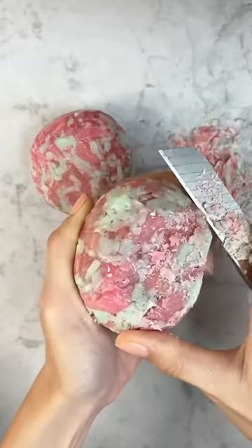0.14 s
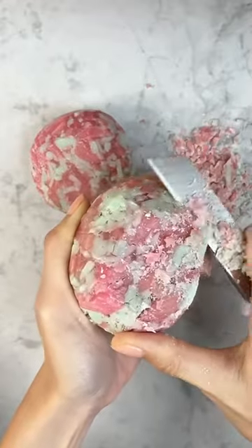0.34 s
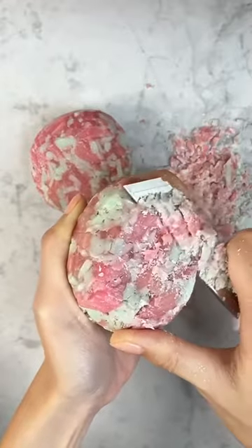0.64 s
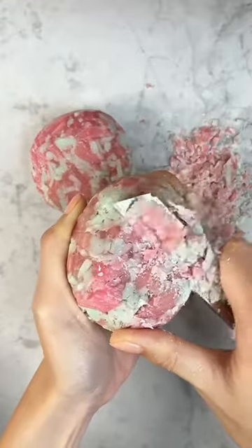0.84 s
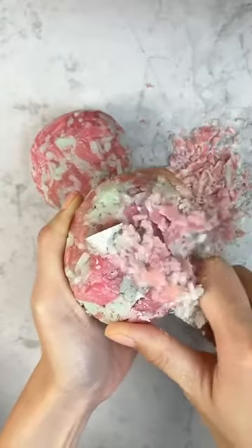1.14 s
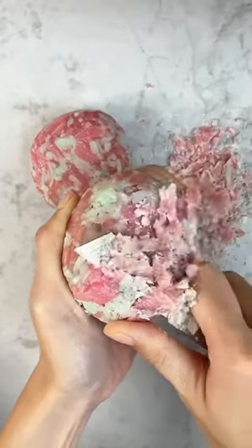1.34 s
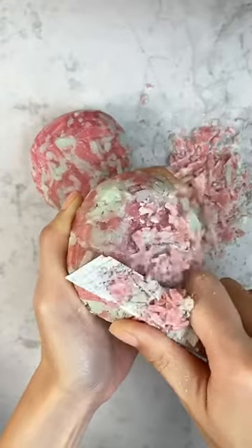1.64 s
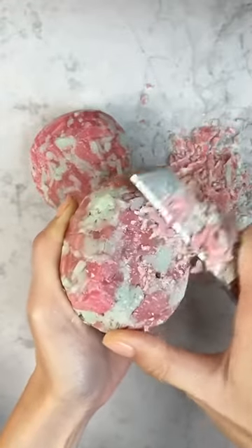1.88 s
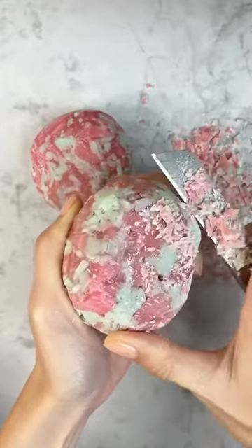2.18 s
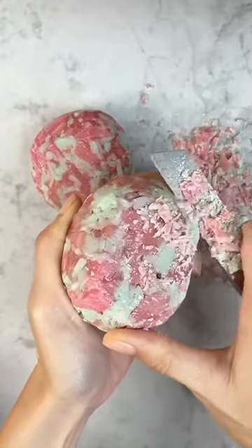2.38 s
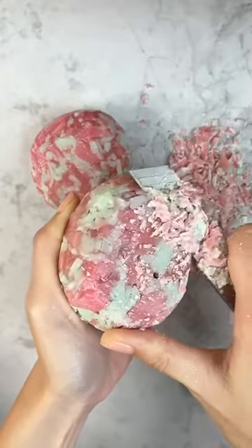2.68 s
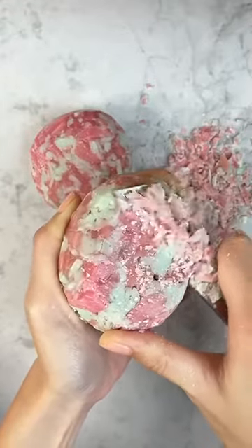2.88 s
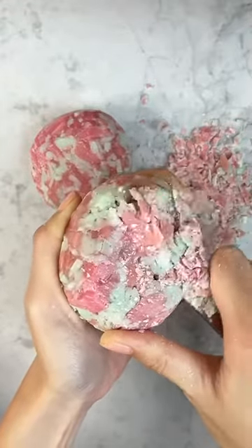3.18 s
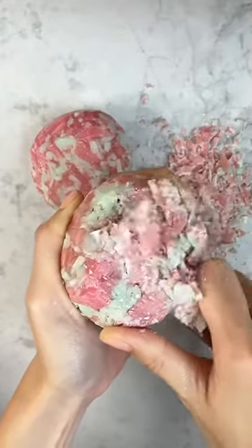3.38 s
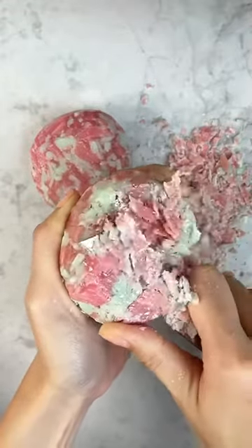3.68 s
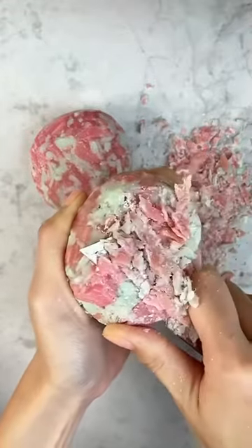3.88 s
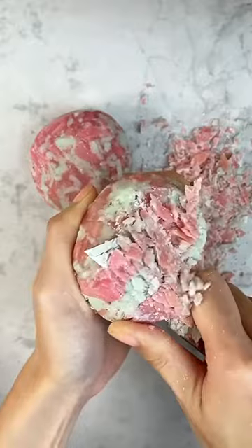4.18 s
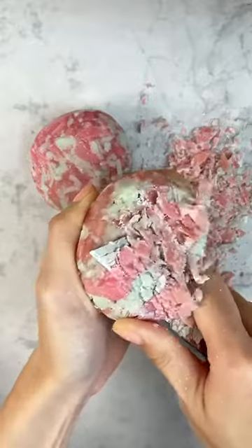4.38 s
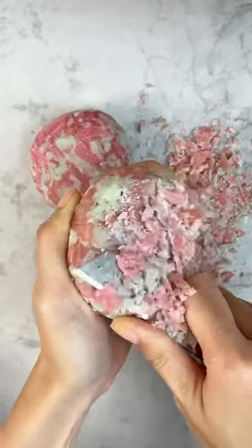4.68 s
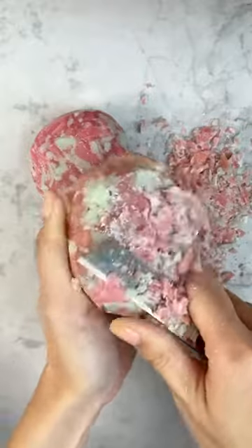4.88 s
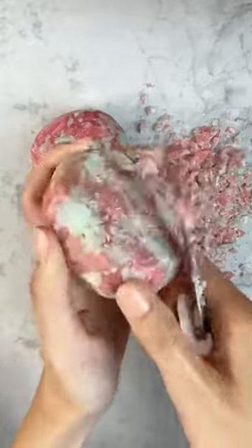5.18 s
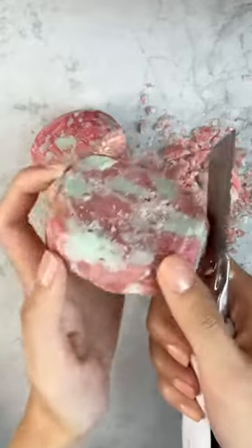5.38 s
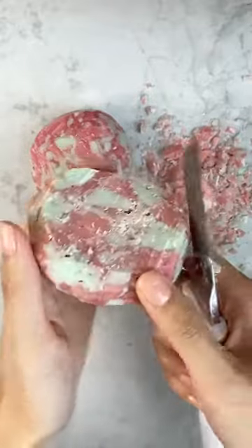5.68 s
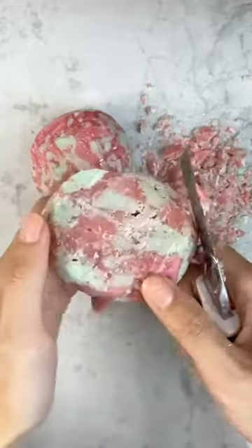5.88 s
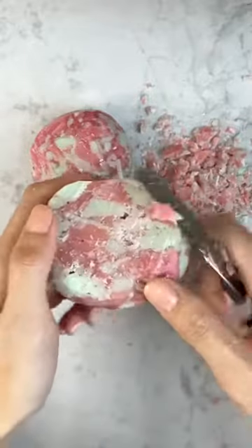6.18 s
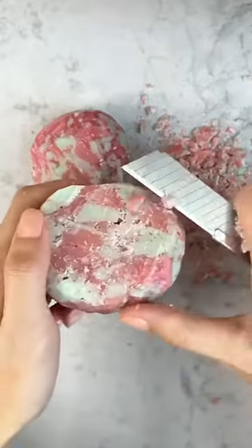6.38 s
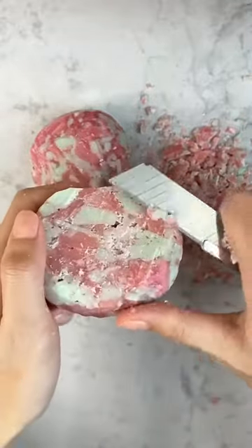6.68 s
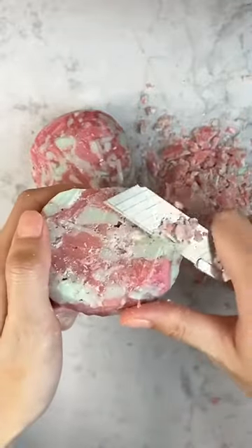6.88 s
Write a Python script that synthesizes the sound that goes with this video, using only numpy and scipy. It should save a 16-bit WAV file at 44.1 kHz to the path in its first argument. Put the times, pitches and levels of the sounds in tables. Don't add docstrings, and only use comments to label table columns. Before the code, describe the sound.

Rough, crackly soap shaving in a quiet room, recorded close and dry. Two long scraping strokes crunch and snap, each easing off before renewed cracking, while the ball knocks softly in the palm. Then the soap is turned with only faint skin brushing and crumbs. A bare blade taps and hits it with a short ring, and a bright crack breaks a piece loose before more crumbling.

```python
import sys
import numpy as np
from scipy import signal
from scipy.fft import rfft, irfft
from scipy.io import wavfile

SR = 44100
rng = np.random.default_rng(int(sys.argv[2]) if len(sys.argv) > 2 else 0)


def put_to_file(sound):
    columns = np.atleast_2d(sound).T
    safe = np.clip(columns, -1, 1)
    whole_steps = np.round(safe * 32767)
    wavfile.write(sys.argv[1], SR, whole_steps.astype(np.int16))


def volts_from_decibels(level):
    exponent = np.asarray(level, float) / 20
    return 10 ** exponent


N = 310464

# pitch_hz, level_db (per Hz)
COARSE_SPECTRUM = [(250, 1), (700, 4), (1300, 1.5), (2200, 2.5), (4300, -0.5), (6500, -5.5), (10000, -10)]
# pitch_hz, level_db (per Hz)
FINE_SPECTRUM = [(3000, -19), (5700, -3), (6900, -3), (8400, -1), (10500, 0), (13500, -1.5), (15800, -5.5)]


def rms_one(x):
    return x / np.sqrt(np.mean(x ** 2) + 1e-20)


def colour(x, spectrum):
    hz, db = np.transpose(spectrum)
    log_hz = np.log(np.maximum(np.fft.rfftfreq(len(x), 1 / SR), 1))
    gain = volts_from_decibels(np.interp(log_hz, np.log(hz), db))
    return rms_one(irfft(rfft(x) * gain, len(x)))


def band_pass(x, low_hz, high_hz):
    return signal.sosfilt(signal.butter(2, [low_hz, high_hz], "band", fs=SR, output="sos"), x)


def drift(rate_hz):
    r = np.exp(-80 * np.pi * rate_hz / SR)
    slow = signal.lfilter([1], [1, -2 * r, r * r], rng.standard_normal(N // 40 + 2002))[2000:]
    return np.interp(np.arange(N) / 40, np.arange(len(slow)), rms_one(slow))


def ring(clicks, hz, t60_s):
    r, w = volts_from_decibels(-60 / (t60_s * SR)), 2 * np.pi * hz / SR
    return signal.lfilter([0, np.sin(w)], [1, -2 * r * np.cos(w), r * r], clicks + 1e-18)


def resonance(x, hz, width_hz):
    r = np.exp(-np.pi * width_hz / SR)
    top = np.array([1, 0, -1]) * (1 - r * r) / 2
    return signal.lfilter(top, [1, -2 * r * np.cos(2 * np.pi * hz / SR), r * r], x)


def grains(per_s, spread_db):
    sizes = volts_from_decibels(spread_db * np.minimum(rng.exponential(1, N), 5)) * rng.choice([-1, 1], N)
    return rms_one(sizes * (rng.random(N) < per_s / SR))


def patchy(x, low_hz, high_hz):
    edges = np.geomspace(low_hz, high_hz, 7)
    bands = [band_pass(x, low, high) for low, high in zip(edges, edges[1:])]
    return rms_one(sum(volts_from_decibels(2 * drift(40)) * band for band in bands))


def rumble():
    # pitch_hz, level_db (per Hz)
    rumble_spectrum = [(3, 0), (12, -5), (24, -13), (33, -22), (50, -18), (80, -28), (150, -40), (600, -80)]
    return volts_from_decibels(-33) * colour(rng.standard_normal(N), rumble_spectrum)


def room():
    # pitch_hz, level_db (per Hz)
    room_spectrum = [(60, -53.5), (170, 2.5), (340, -5), (680, -16), (1700, -18), (6700, -25.5),
                     (12400, -27.5), (16000, -31.5)]
    return volts_from_decibels(-61.5 + 1.0 * drift(6.1)) * colour(rng.standard_normal(N), room_spectrum)


def pressure():
    # start_s, hold_s, crumble_db, dust_db and tremor_db (both relative to the crumble)
    pushes = [(0.0, 0.014, -71, 12, 18.5), (0.323, 0.058, -56, 7, 3.5), (0.446, 0.16, -61, 6, -2),
              (0.653, 0.23, -63.5, 7, 14.5), (0.87, 0.15, -56.5, 8, 8), (1.053, 0.35, -58.5, 6.5, 11),
              (1.467, 0.069, -55.5, 6.5, 10), (1.723, 0.067, -49, -0.5, 5.5), (1.898, 0.14, -54.5, 2.5, 6),
              (2.125, 0.0087, -52.5, -12, 2), (2.411, 0.31, -65, 6, 5), (2.781, 0.63, -59.5, 4.5, 10.5),
              (3.284, 0.036, -55.5, 5, 9), (3.453, 0.36, -66, 9, 16.5), (4.026, 0.55, -82.5, 12, 15),
              (4.526, 0.16, -60.5, 6, 15), (4.759, 0.11, -60, -0.5, 11), (4.911, 0.45, -57.5, 2.5, 10),
              (5.42, 0.3, -69, 7, -7), (5.92, 0.078, -79.5, 13, 24), (6.171, 0.07, -68, -19, 5),
              (6.626, 0.15, -61, 3, -5), (6.896, 0.0094, -54.5, 7, 14), (7.007, 0.055, -62, 9, 7.5)]
    build_db_per_s, ease_db_per_s = 407, 299
    t, out = np.arange(N) / SR, np.full((3, N), -120.)
    for s, hold, db, dust_db, tremor_db in pushes:
        slack_db = build_db_per_s * np.maximum(s - t, 0) + ease_db_per_s * np.maximum(t - s - hold, 0)
        out = np.maximum(out, db - slack_db + np.array([[0], [dust_db], [tremor_db]]))
    return out


def brushes():
    # middle_s, length_s, level_db
    strokes = [
        (1.553, 0.025, -49.5),
        (2.152, 0.056, -65),
        (3.88, 0.022, -62),
        (4.035, 0.043, -69),
        (4.646, .016, -46),
        (4.788, 0.024, -48),
        (5.723, .1, -63),
        (5.847, .06, -68),
        (5.937, 0.072, -65),
        (6.06, 0.037, -71),
    ]
    t = np.arange(N) / SR
    hiss = band_pass(rng.standard_normal(N), 8500, 14500)
    swells = sum(volts_from_decibels(db) * np.exp(-(2 * (t - s) / length) ** 4) for s, length, db in strokes)
    return swells * rms_one(hiss)


def hand(tremor_db):
    shudder = band_pass(rng.standard_normal(N), 80, 220)
    return volts_from_decibels(tremor_db - 6.5 + 2 * drift(12)) * rms_one(shudder)


def slip_judder(bite_hz, luck):
    judder = np.zeros(SR // 8)
    catch_s, settle_s = .007 + .002 * luck[-1], .015 + .003 * luck[-2]
    judder[[0, round(SR / bite_hz), round(catch_s * SR), round(settle_s * SR)]] = -1, -.4, .3, -.18
    return signal.lfilter([1], [1, -1.5, .5625], judder)


def ball(tremor_db):
    # pitch_hz, level_db, t60_s
    ball_modes = [(341.4, -11.5, 0.19), (425, -4.5, 0.054), (522, -3, 0.025), (837, -0.5, 0.071),
                  (1013, 8, 0.038), (1335, -5.5, 0.069)]
    # start_s, peak_db, bite_hz
    knocks = [(0.629, -34, 373), (.699, -27.5, 448), (.775, -27, 412), (0.852, -32.5, 377),
              (0.878, -29.5, 510), (1.048, -31.5, 484), (1.072, -32, 336), (1.102, -25, 413),
              (1.279, -30.5, 397), (1.341, -27.5, 387), (1.52, -34.5, 417), (1.899, -34.5, 410),
              (1.978, -30.5, 344), (2.017, -32, 470), (3.114, -35, 348), (3.17, -35, 410),
              (3.186, -22, 425), (3.523, -25, 423), (3.741, -33, 363), (4.474, -38, 425),
              (4.509, -34.5, 425), (4.916, -34, 338), (4.977, -31.5, 347), (5.064, -33.5, 495),
              (5.932, -46.5, 353), (6.637, -34.5, 322), (2.598, -46, 443), (2.62, -44, 410),
              (3.85, -45, 490)]
    # start_s, peak_db, bite_hz, overtones_db (relative)
    jolts = [(1.464, -22, 424, -8.5), (1.677, -35, 490, -9), (1.9246, -29.5, 520, -4),
             (3.007, -33, 395, -9), (3.072, -36, 1090, 5), (3.686, -36.5, 1360, 0),
             (6.737, -33.5, 980, -12), (6.745, -36.5, 600, -9), (6.172, -38, 780, 4),
             (4.553, -42, 439, -17), (4.593, -31, 402, -4), (4.803, -29, 420, -6.5), (5.125, -28, 1340, 5),
             (6.879, -42.5, 336, 0)]
    # start_s, peak_db, bite_hz
    more_knocks = [(0.463, -43, 315), (0.986, -50, 410), (1.158, -31.5, 350), (1.223, -38, 326),
                   (1.72, -35.5, 510), (1.769, -42, 334), (2.735, -46, 412), (2.933, -37.5, 440),
                   (3.231, -36, 410), (3.363, -44, 447), (3.478, -51, 448), (3.714, -40, 398), (4.569, -36, 425),
                   (4.644, -41, 337), (4.772, -33.5, 330), (5.023, -32.5, 350), (5.202, -45, 563),
                   (5.339, -52, 388), (5.373, -38, 350), (5.965, -51, 342), (7.002, -49, 437),
                   (6.4938, -45.5, 694), (4.697, -44, 520), (1.937, -33, 426), (5.114, -40, 480)]
    soft_overtones_db = -15.5
    slips = [(*row, soft_overtones_db) for row in knocks] + jolts
    slips += [(*row, soft_overtones_db) for row in more_knocks]
    chance = rng.standard_normal((len(slips), len(ball_modes) + 2))
    out = np.zeros(N + SR)
    for (s, peak_db, bite_hz, over_db), luck in zip(slips, chance):
        judder = slip_judder(bite_hz, luck)
        knock = ring(judder, bite_hz, 0.017)
        for k, (hz, db, t60) in enumerate(ball_modes):
            tilt_db = min(over_db - 1.0, 3) if hz > 700 else -20 * (bite_hz > 2 * hz)
            gripped_hz = hz * (1 + 0.021 * luck[k - 3])
            knock = knock + volts_from_decibels(db + 2 * luck[k] + tilt_db) * ring(judder, gripped_hz, t60)
        i = round(s * SR)
        out[i:i + len(knock)] += volts_from_decibels(peak_db + 6.5) * knock / abs(knock).max()
    tremor = grains(250, spread_db=3.5) * volts_from_decibels(2.5 * drift(20))
    drummed = 0
    for k, (hz, db, t60) in enumerate(ball_modes):
        drummed = drummed + (-1) ** k * volts_from_decibels(db - 20.0 * (hz > 700)) * ring(tremor, hz, 0.66 * t60)
    body = out[:N] + volts_from_decibels(tremor_db - 3.5) * rms_one(drummed)
    return signal.sosfilt(signal.butter(1, 240, "high", fs=SR, output="sos"), body)


def taps():
    # start_s, peak_db, pitch_hz
    touches = [
        (0.226, -41.5, 2025),
        (2.286, -47.5, 1870),
        (2.352, -33, 2000),
        (3.931, -48, 1060),
        (4.18, -47, 920),
        (6.028, -46.5, 1020),
        (6.116, -47.5, 2020),
        (6.205, -39, 825),
        (6.245, -40, 1190),
        (6.4971, -37.5, 1940),
    ]
    click = np.zeros(SR // 10)
    click[[0, 70, 150]] = 1, -.7, .4
    click = resonance(click, 2200, 1900) * 1.6
    out = np.zeros(N + SR)
    for s, peak_db, hz in touches:
        tap = ring(click, hz, .010) + .8 * ring(click, hz * 1.5, .004)
        tap = tap + .6 * ring(click, hz / 2, .004) + .5 * click
        i = round(s * SR)
        out[i:i + len(click)] += volts_from_decibels(peak_db - 1.5) * tap
    return out[:N]


def blow(start_s, peak_db, swell_ms, fade_ms, modes):
    lead = SR // 50
    ms = np.arange(-lead, SR // 10) / SR * 1000
    burst = volts_from_decibels(-8.7 * np.where(ms < 0, -ms / swell_ms, ms / fade_ms))
    contacts = rng.standard_normal((len(modes), len(ms))) * burst
    sound = 0
    for (hz, db, t60), contact in zip(modes, contacts):
        mode = ring(contact, hz, t60)
        sound = sound + volts_from_decibels(db) * mode / abs(mode).max()
    out, i = np.zeros(N), round(start_s * SR) - lead
    out[i:i + len(ms)] = volts_from_decibels(peak_db - 9.0) * sound
    return out


def strike():
    # pitch_hz, level_db, t60_s
    strike_modes = [(452, -10, 0.036), (770, 1.5, 0.016), (1105, 0, 0.02), (1710, -8, 0.022),
                    (1960, -3.5, 0.059), (2130, 0.5, 0.013), (2600, -5, .025), (3160, -5, 0.02),
                    (5370, -10.5, 0.016)]
    return blow(6.1598, peak_db=-15, swell_ms=1.2, fade_ms=2.6, modes=strike_modes)


def bite():
    # pitch_hz, level_db, t60_s
    bite_modes = [(2040, -6, 0.011), (3070, 3.5, 0.0096), (3560, -18, 0.013), (4320, 4.5, 0.0092),
                  (4730, -6, 0.011), (5400, -27, 0.011), (7480, -3.5, .012), (8400, -1, 0.0091),
                  (9680, -7, .01)]
    return blow(6.7265, peak_db=-10, swell_ms=2.5, fade_ms=1.5, modes=bite_modes)


def ticks():
    # start_s, peak_db, pitch_hz
    fractures = [(0.3793, -26, 6370), (0.465, -32, 2670), (0.505, -29, 5990), (0.5658, -29, 8350),
                 (0.6287, -24, 9990), (0.6877, -32, 9910), (0.9057, -26, 8100), (0.988, -28, 5680),
                 (1.0225, -34, 5250), (1.2194, -31, 7280), (1.2578, -28, 5600), (1.3101, -22, 1640),
                 (1.439, -29, 9990), (1.5145, -21, 4820), (1.547, -29, 2330), (1.6789, -33, 1210),
                 (1.8749, -30, 1850), (1.924, -22, 1420), (1.9448, -7, 9990), (1.9466, -9, 2630),
                 (1.9481, -10, 4440), (2.3524, -30, 2020), (2.4038, -33, 1980), (2.458, -34, 3360),
                 (2.5021, -38, 5900), (2.546, -36, 4910), (2.7434, -29, 2710), (2.7789, -29, 6070),
                 (2.8927, -32, 5510), (2.9322, -33, 1380), (2.9605, -26, 1810), (3.0707, -23, 1680),
                 (3.0835, -20, 2760), (3.1604, -31, 2240), (3.2861, -13, 9990), (3.3365, -24, 5170),
                 (3.3587, -35, 5040), (3.3937, -31, 2890), (3.6864, -32, 1380), (3.7274, -26, 2330),
                 (3.7579, -33, 2200), (4.5088, -33, 5810), (4.6048, -17, 5810), (4.7626, -26, 9990),
                 (4.8081, -27, 1810), (4.991, -30, 4180), (5.0356, -21, 9990), (5.0656, -18, 4650),
                 (5.084, -30, 5080), (5.1261, -15, 5810), (5.2206, -30, 5860), (5.3414, -32, 4910),
                 (5.6788, -37, 3570), (6.6354, -29, 4650), (6.7256, -13, 4650), (6.7267, -11, 2540),
                 (6.8659, -38, 9990), (6.8799, -28, 5170), (6.9162, -29, 2410), (6.9596, -30, 8910)]
    out, ms = np.zeros(N + SR), np.arange(SR // 100) / SR * 1000
    sparks = 0.56 * rng.standard_normal((len(fractures), len(ms))) * np.exp(-ms / 0.2)
    sparks[:, 0] = -1
    for (s, peak_db, hz), spark in zip(fractures, sparks):
        spark = resonance(spark, hz, hz * 0.88)
        spark = signal.lfilter([1], [1, -np.exp(-np.pi * hz / SR)], spark)
        i = round(s * SR) - 2
        out[i:i + len(ms)] += volts_from_decibels(peak_db - 2.5) * spark / abs(spark).max()
    return out[:N]


def cracks():
    # top_s, flake_hz, coarse_db, fine_db
    snaps = [(.265, 6040, -50.5, -40), (.629, 8360, -48, -33.5), (.9201, 5750, -34.5, -41),
             (.9888, 6160, -40.5, -38), (1.3115, 3020, -38.5, -37), (1.4394, 8610, -70, -41),
             (1.4641, 1700, -64, -64), (1.4738, 6160, -53, -40), (1.5159, 7040, -25.5, -33),
             (1.5477, 2600, -40, -37), (1.6943, 3330, -41, -56), (1.9256, 3200, -28.5, -51),
             (2.045, 2460, -50, -49), (2.8924, 2540, -39.5, -62.5), (2.9341, 3250, -38.5, -38),
             (3.1605, 2880, -53, -60), (3.3372, 3030, -34, -28.5), (3.3938, 2650, -43, -41),
             (3.688, 1390, -39.5, -66), (4.508, 5640, -48, -65), (4.6036, 3300, -27, -26.5),
             (4.8095, 1760, -35.5, -72), (5.126, 3500, -26.5, -23.5), (5.129, 1500, -34, -42),
             (5.16, 1690, -35.5, -45), (5.2354, 2560, -36.5, -47), (5.3412, 4840, -41, -39.5),
             (5.6802, 5800, -44.5, -47), (6.636, 3000, -39.5, -58), (6.7265, 4600, -23.5, -26),
             (1.9448, 3050, -26, -14), (1.9487, 4320, -25, -16.5), (1.795, 5900, -50, -55),
             (2.9605, 1000, -40, -51), (1.992, 4000, -40, -36.5), (1.96, 3200, -39, -40),
             (4.799, 5000, -54, -60), (6.733, 8400, -35, -35)]
    splits = [(.564, 8500, -41, -36), (.712, 2370, -38.5, -35.5), (.9069, 7700, -40, -30),
              (1.023, 2460, -43.5, -41), (1.2197, 3200, -43.5, -35), (1.2585, 8250, -45, -34),
              (1.4036, 6100, -52, -50), (1.6816, 1400, -39.5, -63), (1.7484, 3400, -36.5, -41),
              (4.934, 4000, -49, -51), (2.403, 1960, -36.5, -45), (3.071, 1210, -33, -36),
              (3.0838, 2850, -34.5, -30), (3.2853, 6450, -41, -19.5), (3.5245, 3160, -48, -48),
              (3.7279, 1950, -34, -50), (3.7576, 3080, -46.5, -43), (4.7614, 9300, -40.5, -34.5),
              (4.9912, 4240, -46, -43), (5.036, 1610, -33, -33), (5.0656, 4630, -27.5, -27),
              (5.084, 2960, -38, -37), (5.1979, 2480, -50, -66), (5.3733, 3380, -44.5, -63),
              (6.163, 2110, -36, -22), (6.9154, 2700, -38.5, -38), (6.961, 8360, -47, -34.5)]
    crushes = [(.1962, 2040, -54, -51), (.3777, 4850, -41, -42.5), (.465, 6250, -36.5, -35.5),
               (.7537, 7400, -46, -40), (.937, 2600, -37.5, -34), (1.3576, 1660, -44, -61),
               (1.488, 6650, -46, -45), (1.7654, 5950, -41.5, -40), (1.875, 2000, -43, -38.5),
               (1.8987, 3100, -74, -49), (2.46, 2060, -40.5, -40.5), (2.5743, 2080, -43, -52),
               (2.6978, 1990, -48.5, -47), (2.7458, 2550, -39, -38.5), (2.9705, 5530, -38.5, -34.5),
               (3.3147, 2420, -39, -35), (3.5897, 4930, -47.5, -43.5), (3.6496, 3320, -59, -71),
               (4.0412, 5440, -69, -58), (4.3237, 5180, -61, -53.5), (4.5207, 7600, -81, -44.5),
               (5.2216, 5950, -39.5, -40.5), (5.2645, 1620, -48, -40.5), (5.5059, 1950, -59, -73),
               (6.76, 6040, -46.5, -46.5)]
    tears = [(.3291, 2750, -51, -56), (.5126, 5760, -43.5, -36), (.6488, 8670, -78, -48),
             (.696, 1640, -43.5, -37), (.7763, 1700, -48.5, -45), (.85, 5940, -47, -44),
             (1.1015, 6450, -38.5, -38), (1.383, 5760, -57, -66), (1.736, 3220, -49, -44),
             (1.9625, 1770, -37, -51), (2.15, 6360, -54, -43.5), (2.501, 5860, -48, -53),
             (2.545, 5030, -47.5, -47.5), (2.778, 5960, -48, -38.5), (2.835, 2100, -53.5, -40.5),
             (3.0126, 5730, -52, -44), (3.1863, 1600, -45, -47.5), (3.3602, 2660, -47.5, -38.5),
             (4.4698, 4700, -60.5, -55), (4.7797, 3390, -62, -60), (4.9167, 4280, -55, -53),
             (5.3063, 6000, -59, -47), (5.8421, 6200, -64, -61), (6.8802, 1710, -38, -37),
             (6.172, 2560, -43, -63), (6.745, 980, -46, -59), (6.757, 4500, -57, -59),
             (4.645, 2950, -53, -54), (4.618, 2540, -46.5, -43), (5.14, 2500, -47, -42.5),
             (.25, 8000, -78, -57), (2.365, 2000, -58, -59), (3.87, 1700, -75, -65)]
    crumbs = [(.0716, 1970, -54.5, -51), (.4415, 2110, -50, -48), (.68, 5700, -47, -48),
              (.826, 6000, -51, -54), (2.0668, 6030, -58, -53), (2.1126, 1900, -49, -65),
              (2.597, 6100, -54, -58), (2.6223, 6140, -51, -50), (2.7, 5900, -51, -52),
              (2.961, 2000, -41, -36), (3.048, 2480, -50, -62), (3.0545, 1800, -52, -62),
              (3.1132, 4500, -54, -56), (3.8255, 8970, -70, -55), (3.851, 1460, -55, -70),
              (4.18, 7000, -70, -66), (4.25, 7000, -72, -66), (5.9316, 3300, -60.5, -58),
              (6.106, 1980, -56, -75), (6.1377, 2000, -54, -74), (6.207, 5500, -55, -58),
              (6.216, 900, -53, -70), (6.232, 2000, -54, -64), (6.247, 3200, -54, -56),
              (6.27, 4000, -56, -60), (6.283, 1000, -56, -72), (6.315, 5000, -57, -61),
              (6.3313, 6000, -58, -60), (6.689, 6000, -54, -56), (6.738, 1700, -38, -52),
              (6.785, 5900, -55, -64)]
    kinds = [(snaps, (1.1, 1.9)), (splits, (.7, 4.66)), (crushes, (5, 5.7)), (tears, (6.1, 16.9)),
             (crumbs, (1.3, 2.1))]
    breaks = [(*row, *shape_ms) for rows, shape_ms in kinds for row in rows]
    lead, out = SR // 25, np.zeros(N + SR)
    ms = np.arange(-lead, 3 * lead) / SR * 1000
    coarse = colour(grains(12000, spread_db=-1), COARSE_SPECTRUM)
    fine = colour(grains(17000, spread_db=4.5), FINE_SPECTRUM)
    splinters = rng.random((len(breaks), 2))
    for (s, hz, coarse_db, fine_db, swell, fade), (low_luck, high_luck) in zip(breaks, splinters):
        span = round(s * SR) - lead + np.arange(len(ms))
        rise = volts_from_decibels(-7.0 * (abs(ms) / max(swell, .2)) ** 0.97)
        fall = volts_from_decibels(-7.0 * (abs(ms) / max(fade, .5)) ** 1.5) + .1 * volts_from_decibels(-.9 * ms)
        first = 0.24 * volts_from_decibels(-15 * ms * (ms > 0))
        shape = np.where(ms < 0, rise, np.minimum(fall, 1) + first)
        low, high = shape * coarse[span % N], shape * fine[span % N]
        flake = resonance(low, hz, hz * .11)
        low = 0.59 * low + 1.82 * flake + 0.4 * resonance(low, 1500 * 4 ** low_luck, 540)
        high = 0.53 * high + 0.55 * resonance(high, 7000 * 2 ** high_luck, 1150)
        out[span] += volts_from_decibels(coarse_db + 0.34) * low + volts_from_decibels(fine_db + 0.16) * high
    return out[:N]


def crumble(coarse_db, fine_db, breaks):
    # pitch_hz, width_hz, level_db
    blade_modes = [(2020, 260, 5), (4900, 320, 3), (6150, 300, 19)]
    # time_s, ring_db
    free_blade = [
        (.55, -1),
        (1.1, -14),
        (2.25, -14),
        (2.45, 0),
        (2.7, -3),
        (3.3, -14),
    ]
    clump_db = 2.6 * drift(49) + 0.35 * drift(136)
    coarse = patchy(colour(grains(4000, spread_db=3.0), COARSE_SPECTRUM), low_hz=501, high_hz=10740)
    fine = patchy(colour(grains(9000, spread_db=3.5), FINE_SPECTRUM), low_hz=4100, high_hz=18300)
    snapping = signal.lfilter([1], [1, -.985], abs(grains(120, spread_db=3)))
    opening = 1 + 2.2 * np.clip((coarse_db + 72) / 8, 0, 1) * np.tanh(.09 * snapping)
    coarse = volts_from_decibels(coarse_db + clump_db) * opening * coarse
    fine = volts_from_decibels(fine_db + 0.44 * clump_db) * opening * fine
    drive = coarse + 0.07 * breaks
    blade = sum(volts_from_decibels(db) * resonance(drive, hz, width) for hz, width, db in blade_modes)
    ring_db = np.interp(np.arange(N) / SR, *np.transpose(free_blade))
    return coarse + fine + volts_from_decibels(ring_db) * blade


def scene():
    coarse_db, fine_db, tremor_db = pressure()
    breaks = cracks()
    soap = crumble(coarse_db - 0.5, fine_db - 7.0, breaks) + breaks + ticks()
    blade = taps() + strike() + bite()
    held = ball(tremor_db) + hand(tremor_db) + brushes()
    return (soap + blade + held + room() + rumble())[None]


def roll_off(x):
    return signal.sosfilt(signal.butter(12, 16640, fs=SR, output="sos"), x)


def record(dry):
    cutoff_hz = 15800
    cut = signal.sosfilt(signal.ellip(8, .5, 29, cutoff_hz, fs=SR, output="sos"), dry)
    cut = signal.sosfilt(signal.ellip(8, .5, 60, cutoff_hz + 800, fs=SR, output="sos"), cut)
    return roll_off(cut)


dry = scene()
out = record(dry)
put_to_file(out)
```